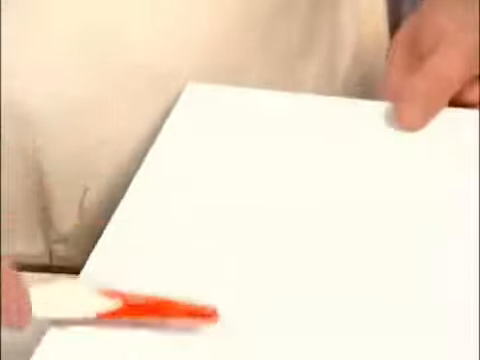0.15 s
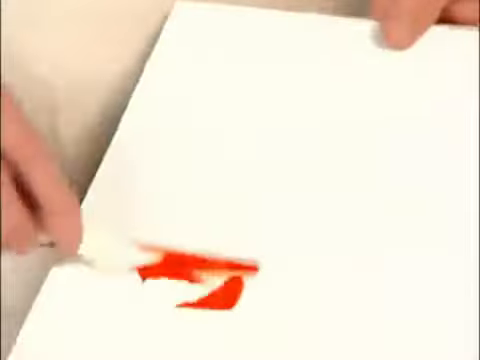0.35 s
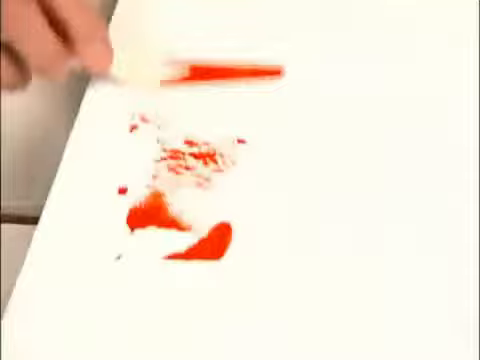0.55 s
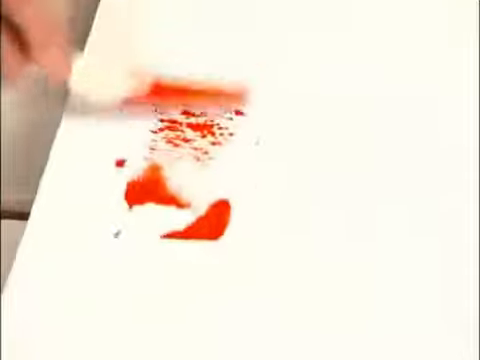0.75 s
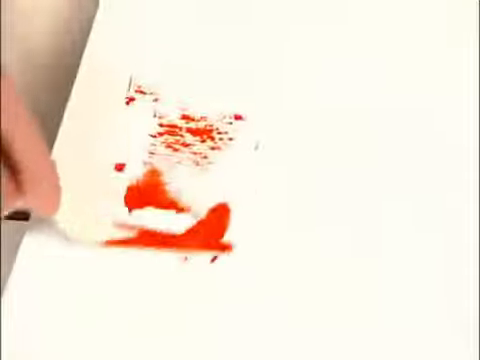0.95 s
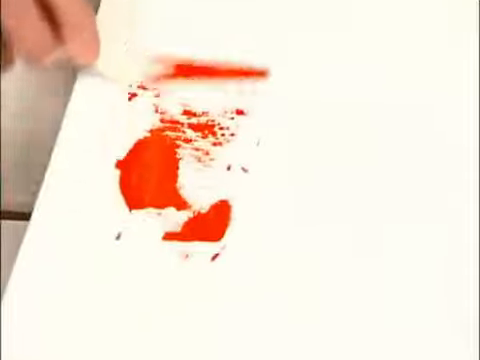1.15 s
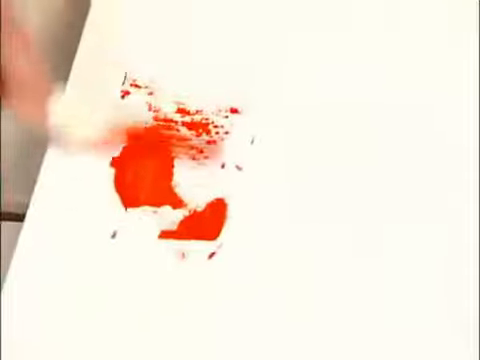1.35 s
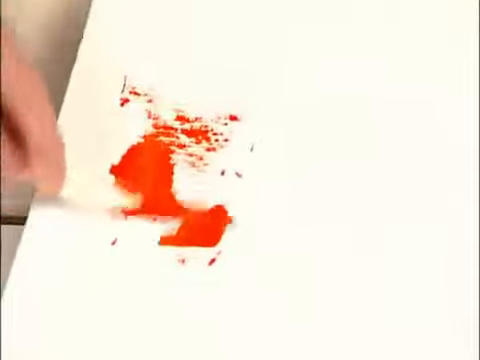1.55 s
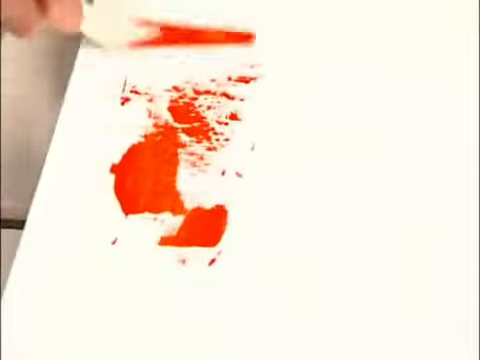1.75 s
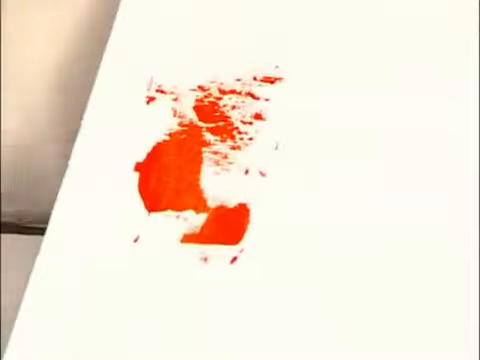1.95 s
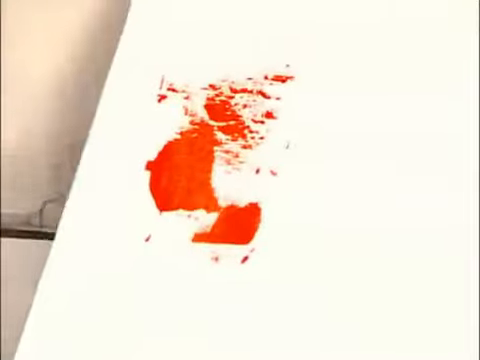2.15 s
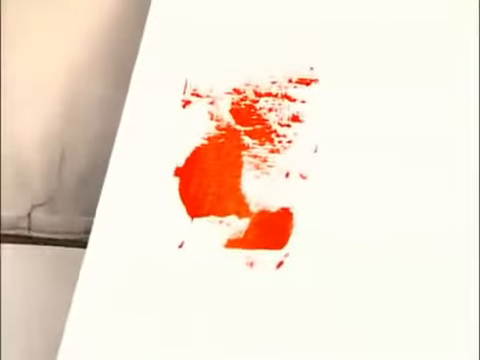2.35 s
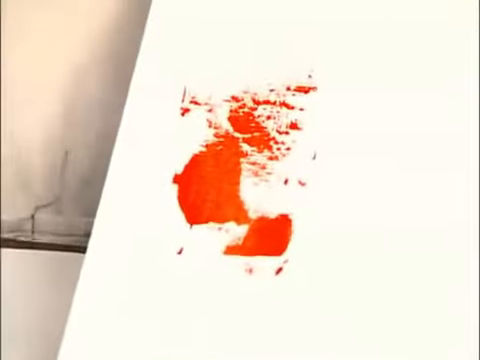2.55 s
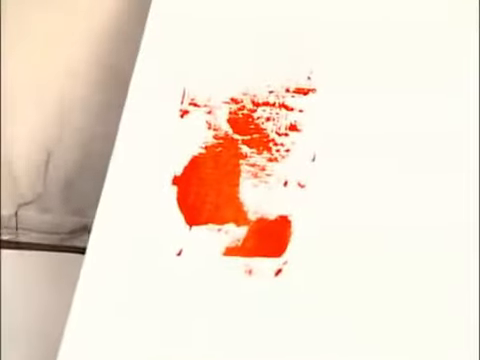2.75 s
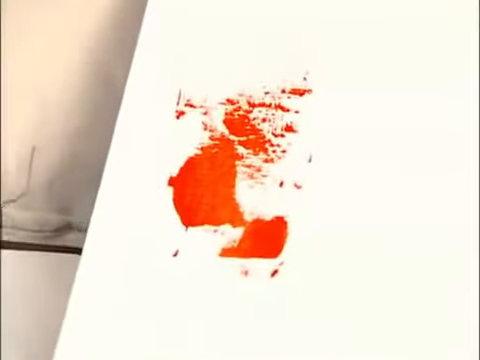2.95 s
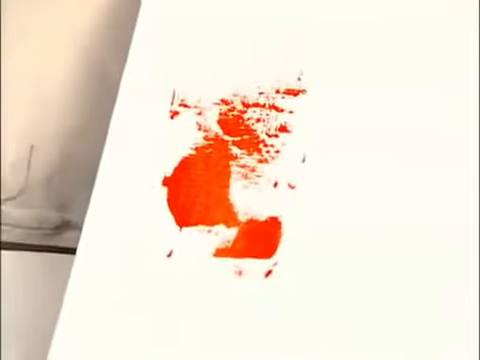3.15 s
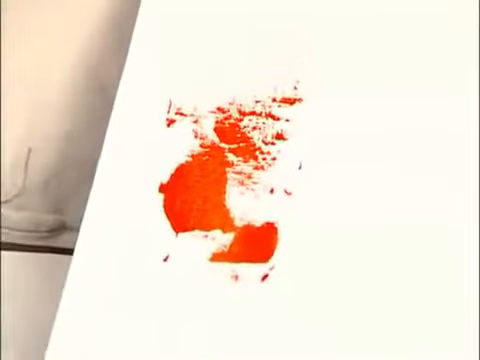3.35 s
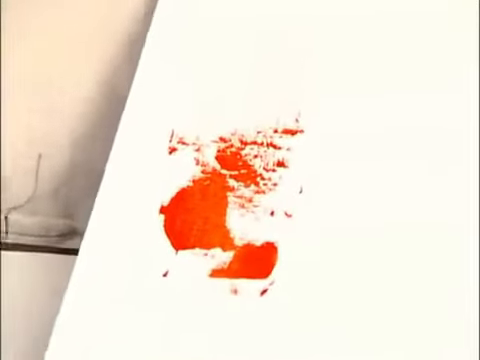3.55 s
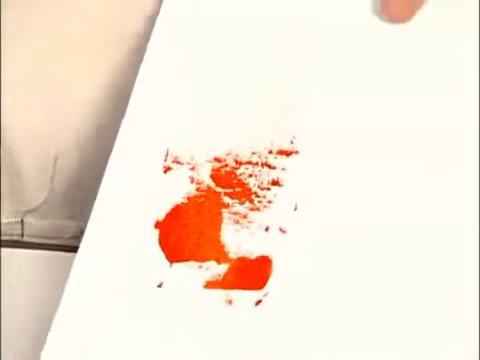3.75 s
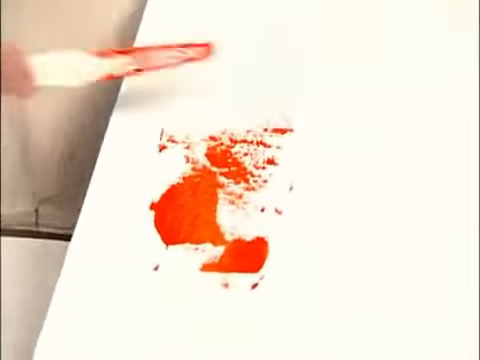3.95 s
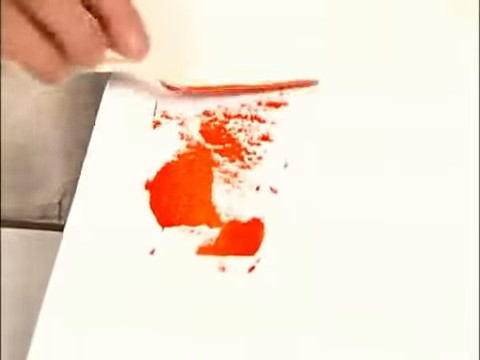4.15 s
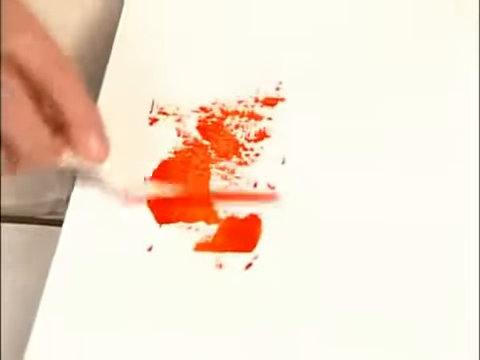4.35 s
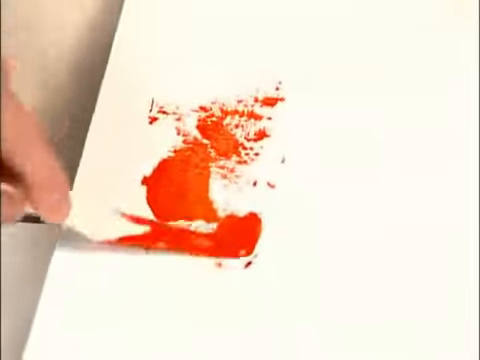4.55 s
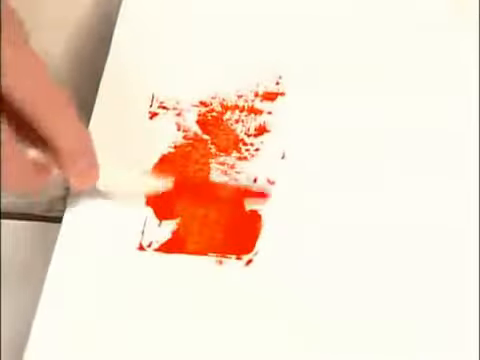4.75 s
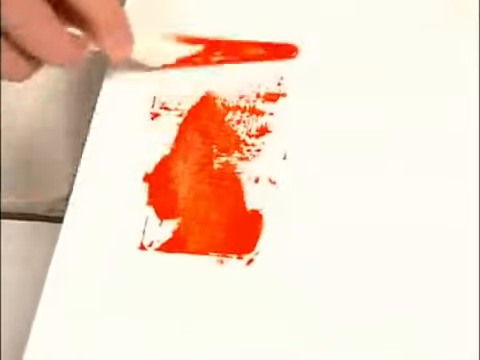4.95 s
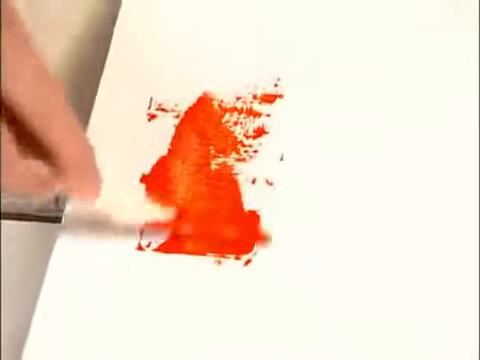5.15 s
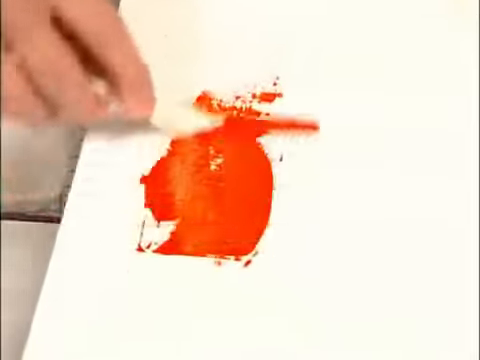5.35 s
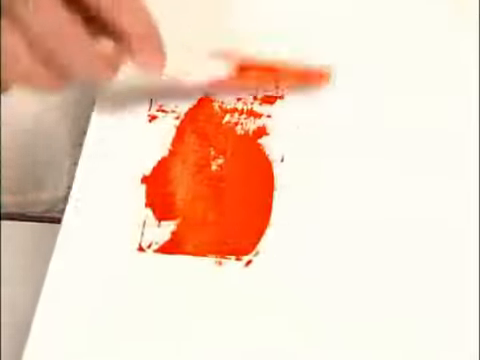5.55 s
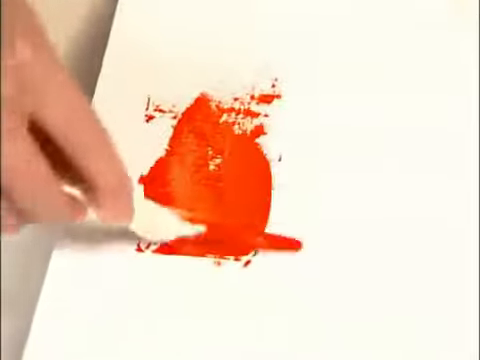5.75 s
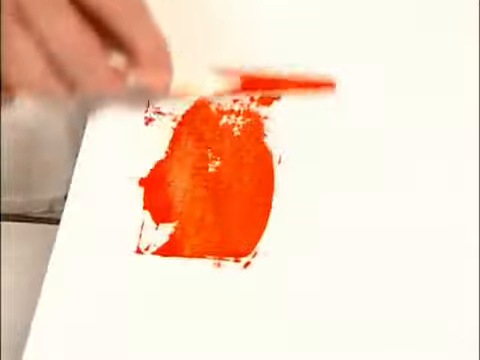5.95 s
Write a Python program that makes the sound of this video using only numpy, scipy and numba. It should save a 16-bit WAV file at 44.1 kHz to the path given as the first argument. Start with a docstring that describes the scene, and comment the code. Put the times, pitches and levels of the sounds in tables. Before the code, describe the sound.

A small, quiet indoor room with faint low air and barely audible mains hum, heard close up. From 0.45 s a paint-loaded blade scrapes a canvas board: two joined raspy strokes to about 0.8 s, ending in a dull, wet little smack. Another pair runs from 1.1 to 1.4 s, the first swelling into its lift, the second hissier, then a third pair from 1.7 to 1.95 s. Each is a dry, bright, gritty swish with a hollow board rub beneath. From 2 to 4.3 s it is nearly silent: a soft airy wipe around 2.4 s, a very faint cloth whirr, light taps, and a dull board shift near 3.6 s. Firmer strokes return at 4.35, 4.87, 5.4 and 5.93 s, spaced about half a second apart, with knocks on landing, a hard click at 4.87 s, a sharp snap near 5 s, and the last stroke swelling strongly at the end.

```python
"""Painting blade on a canvas board

A flat painting blade spreads paint over a canvas board in two runs of quick strokes, close by in a small quiet room.
Its edge sticks and slips on the weave thousands of times a second: random slips excite resonances,
so the blade rasps high up and the board answers with a hollow rub. Ticks, snags and smacks are short transients.
Between the strokes it scoops fresh paint (swelling filtered slips), a ribbed sleeve sings faintly
and the board is shifted in the hand; room air (filtered noise) and mains hum (a sine) lie underneath."""
import sys
import numpy as np
from scipy import signal
from scipy.fft import rfft, irfft, next_fast_len
from scipy.io import wavfile
from scipy.ndimage import uniform_filter1d
from numba import njit

SR = 44100
rng = np.random.default_rng(int(sys.argv[2]) if len(sys.argv) > 2 else 0)


def file_out(sig):
    """Save sig as 16-bit WAV at sys.argv[1]."""
    # one column per channel
    cols = np.atleast_2d(sig).T
    # limit, then scale
    lim = np.clip(cols, -1, 1)
    pcm = np.round(lim * 32767).astype(np.int16)
    wavfile.write(sys.argv[1], SR, pcm)


N = 268701
T = np.arange(N) / SR  # time [s]

# Sweeps of the blade; force is 0 dB in a firm stroke, and the colour depends on where and at what angle it is held:
# (start [s], swell [s], ease [s], crest force [dB], force on landing re crest [dB], force on lifting re crest [dB],
#  edge sizzle at 0 dB force [dB], blade resonance at the crest [Hz], blade's low mode re scratch [dB],
#  board at 0 dB force [dB], board resonance [Hz], upper board modes, relative [dB])
STROKES = [ (0.458, 0.12, 0.12, -2.5, -21, -27.5, -52, 5950, -8.5, -46.5, 695, -3),
           (0.666, 0.03, 0.085, -0.5, -9, -6.5, -50.5, 6660, -8, -48.5, 612, -3),
           (1.090, .160, .020, -16.5, -27, -3.5, -54, 7330, -5, -50, 620, -1),
           (1.262, 0.075, 0.043, -2, -16, -2, -42, 6950, -1, -50.5, 622, 0.5),
           (1.695, .092, 0.031, -2, -12, -11, -45.5, 6990, -7, -44, 595, -4.5),
           (1.881, 0.041, 0.01, -12, -24, -2.5, -50.5, 7030, -9, -51, 594, -9.5),
           (4.337, 0.12, 0.13, 3, -21, -18.5, -55, 5830, -6, -46.5, 719, -1.5),
           (4.863, .124, 0.13, 6, -23.5, -14.5, -50.5, 6250, -6, -47, 585, -0.5),
           (5.404, .140, 0.1, -2, -11, -9, -49.5, 6850, -9.5, -47, 576, -3.5),
           (5.933, 0.11, 0.04, 3.5, -13.5, 3, -45.5, 6790, -14.5, -46, 590, 1.5), ]
# The blade's broad scratch: (frequency [Hz], spectral level [dB])
SCRATCH_COLOUR = [(900, -25.5), (1500, -0.5), (1750, 3), (2000, -8.5), (2400, 4), (3200, 4.5), (4200, 0),
                  (5500, -3), (8000, -20), (12000, -25.5)]
# The thin edge parting wet paint: (frequency [Hz], spectral level [dB])
SIZZLE_COLOUR = [(5000, 1.5), (8000, 6), (9800, 12), (11500, 6.5), (13000, 0), (15000, -11)]
# The flat of the blade digs in and the board grunts at the pitch of that spot: (time [s], level [dB], pitch [Hz])
DIGS = [(0.488, -48.5, 760), (0.565, -46, 720), (0.800, -51, 560), (1.151, -54.5, 490), (1.403, -48, 600),
        (1.719, -41.5, 500), (1.919, -45, 610), (4.877, -45, 600), (4.965, -40, 590), (5.094, -48, 580),
        (5.439, -37, 570), (5.650, -46.5, 640), (5.975, -39, 580)]
DIG_S = 0.01  # time from the middle of a dig until its depth is 1 / e
RASP_DB, SCRATCH_DB = -38.5, -51  # levels at 0 dB force
SCRATCH_SLOPE, SIZZLE_SLOPE, BOARD_SLOPE = 0.65, 0.38, 0.35  # dB per dB of force: these grow more slowly than the rasp
BLADE_LOW_HZ = 2300  # the blade's low bending mode, on average
BLADE_RISE_OCT_PER_S = 1  # the blade's resonance climbs as it is drawn along
LIFT_DB_PER_S = 510  # fade once lifted


def strokes():
    """Stick-slip friction: the same slips ring the blade and the board, and one force drives every layer."""
    rows = np.array(STROKES)
    current = np.maximum(np.searchsorted(rows[:, 0], T) - 1, 0)
    (start, swell_s, ease_s, crest_db, land_db, lift_db,
     sizzle_db, blade_hz, low_db, board_db, board_hz, upper_db) = rows[current].T
    since_crest = T - start - swell_s
    force_db = crest_db + swell(since_crest, swell_s, ease_s, land_db, lift_db)
    touching = gate(start, swell_s + ease_s, LIFT_DB_PER_S)
    blade_hz = blade_hz * 2 ** (BLADE_RISE_OCT_PER_S * np.clip(since_crest, -swell_s, ease_s))

    slips = catches(per_s=5400, spread_db=3.0, patchy_db=1.17, patch_rate=240)
    ring = unit(blade(slips, blade_hz))
    # coarser catches scratch; the slips also bend the blade in its low mode
    coarse = catches(per_s=5400, spread_db=3.5, patchy_db=1.0, patch_rate=89)
    low_hz = BLADE_LOW_HZ * (1 + 0.026 * walk(25))
    low_mode = unit(resonate(slips, low_hz, width_hz=630))
    scratch = unit(colour(coarse, SCRATCH_COLOUR)) + undb(low_db) * low_mode
    parting = catches(per_s=2000, spread_db=3.5, patchy_db=-1.95, patch_rate=100)
    sizzle = unit(colour(parting, SIZZLE_COLOUR))
    rasp = (undb(RASP_DB + force_db) * ring
            + undb(SCRATCH_DB + SCRATCH_SLOPE * force_db) * scratch
            + undb(sizzle_db + SIZZLE_SLOPE * force_db) * sizzle)
    rasp = glance(rasp, lag_s=.00223, share=0.068)

    # the whole face of the blade also drags on the board through the paint
    drag = catches(per_s=6000, spread_db=3, patchy_db=2.0, patch_rate=45)
    digs = 0
    for time, db, hz in DIGS:
        depth = np.exp(-((T - time) / DIG_S) ** 2)
        digs = digs + undb(db) * depth
        board_hz = board_hz + (hz - board_hz) * depth ** .3  # the pitch bends over more slowly than the level
    rub = unit(board(slips + 1.18 * drag, board_hz, upper_db))
    stroke_gain = touching * undb(board_db + BOARD_SLOPE * force_db)
    return touching * rasp + np.hypot(stroke_gain, digs) * rub


SWELL_POWER = 1.5  # roundness of the crest


def swell(since_crest, rise_s, fall_s, first_db, last_db):
    """Force envelope in dB re its crest: it builds from the landing and eases towards the lift."""
    away = np.clip(np.maximum(-since_crest / rise_s, since_crest / fall_s), 0, 1)
    return np.where(since_crest < 0, first_db, last_db) * away ** SWELL_POWER


# The blade's narrow modes, which slide with its main resonance:
# (ratio to main resonance, width of each filter pass [Hz], mean level [dB])
BLADE_MODES = [(0.761, 400, -31.5), (0.958, 491, -2), (1.068, 401, 1), (1.2, 600, -5)]


def blade(push, main_hz):
    """Modal resonance: one broad mode, and narrow modes that quiver and trade strength with the contact point."""
    ring = resonate(push, main_hz, width_hz=4230)
    for ratio, width, db in BLADE_MODES:
        quiver = 1 + .02 * walk(45)
        strength = undb(db + 3.3 * walk(30))
        ring = ring + strength * resonate(push, ratio * main_hz * quiver, width)
    return ring


# The board's fixed modes: (frequency [Hz], width of each filter pass [Hz], level [dB])
BOARD_MODES = [(545, 70, -2), (750, 110, -3), (1075, 140, -6), (1220, 240, -16)]


def board(push, main_hz, upper_db):
    """Plate modes: a main mode that depends on where the board is pressed, and fixed modes around it."""
    ring = resonate(push, main_hz, width_hz=138)
    for k, (hz, width, db) in enumerate(BOARD_MODES):
        delayed = np.roll(push, 40 * k)  # each mode 40 samples later than the one before
        ring = ring + undb(db + upper_db * (k >= 2)) * resonate(delayed, hz, width)
    # below these modes the board hardly radiates: only a weak flexing of the whole panel is left
    flex = undb(-22.5) * resonate(push, 388, width_hz=460)
    radiating = signal.butter(5, 480, "high", fs=SR, output="sos")
    return signal.sosfilt(radiating, ring) + flex


def glance(x, lag_s, share):
    """Comb interference: one early reflection from a nearby surface ripples the spectrum."""
    return (x + share * np.interp(T - lag_s, T, x)) / np.hypot(1, share)


# The blade taps the board as it lands or flicks off; levels are those of the noise before the filters:
# (time [s], edge level [dB], board knock level [dB], decay T60 [s])
TICKS = [(0.431, -49.5, -27.5, 0.08), (0.465, -36.5, -52, 0.037), (0.818, -40.5, -44, 0.022),
         (1.06, -38.5, -35, 0.034), (1.409, -36, -29, 0.02), (1.622, -39, -35.5, 0.16),
         (4.31, -35, -25.5, 0.057), (4.757, -50.5, -39, 0.037), (4.798, -48.5, -37.5, 0.042),
         (4.819, -39.5, -30.5, 0.028), (4.868, -21, -23.5, 0.038), (4.888, -26.5, -47, 0.024),
         (5.354, -43, -35, 0.092), (5.408, -40, -21, 0.033), (5.645, -29.5, -24.5, 0.014),
         (5.679, -39, -51, 0.015), (5.897, -36.5, -37, 0.011), (5.935, -45, -22.5, 0.013)]
# Clicking blade: (frequency [Hz], spectral level [dB])
TICK_COLOUR = [(600, -17.5), (1200, -17.5), (1900, -8.5), (2600, -20.5), (4500, -13.5), (6200, -9),
               (8000, -10), (10000, -13.5), (15000, -35)]


def ticks():
    """Impact excitation: each touch is a short burst of slips that clicks in the blade and knocks on the board."""
    edge, knock = 0, 0
    for time, db, knock_db, t60 in TICKS:
        # the first contact is a hard tick, the rest a softer skid
        touch = burst(time, t60) + undb(4) * burst(time, t60=0.0097)
        edge = edge + undb(db) * touch
        knock = knock + undb(knock_db) * touch
    return colour(edge, TICK_COLOUR) + board(knock, main_hz=744, upper_db=-5.5)


# The edge snags on the weave and snaps free: (time [s], peak level of one full snap [dB])
SNAGS = [(0.6767, -26.5), (1.7215, -32), (1.776, -25.5), (1.916, -37.5), (4.4077, -24.5), (4.9793, -10.5),
         (4.996, -16.5), (5.1150, -26), (5.6136, -36), (5.6458, -28.5), (5.9514, -27), (5.9975, -25),
         (6.06, -32), (6.0854, -23)]


def snags():
    """Impulse response: a snag frees itself in two quick slips, the second stronger, each a sharp ringing snap."""
    slip = 1. * (T == 0)
    ring = undb(25.5) * resonate(slip, 6560, width_hz=1020)
    snap = colour(slip, TICK_COLOUR) + 1.5 * colour(slip, SIZZLE_COLOUR) + ring
    snap = snap / np.abs(snap).max()
    pair = .6 * snap + np.interp(T - .0018, T, snap, left=0)
    return sum(undb(db) * np.interp(T - time, T, pair, left=0) for time, db in SNAGS)


# The blade peels off the wet paint with a smack: (time [s], burst level before the resonance [dB], pitch [Hz])
SMACKS = [(0.841, -26, 970), (1.431, -35, 1090), (5.678, -60, 1063)]


def smacks():
    """Damped resonance: the paint film breaks with a very short, dull pop."""
    return sum(undb(db) * resonate(burst(time, t60=0.021), hz, width_hz=830) for time, db, hz in SMACKS)


# The held board flexes with a soft low bump: (time [s], level before the envelope [dB], pitch [Hz])
BUMPS = [(0.15, -53.5, 234), (0.841, -46.5, 140), (0.958, -52, 238), (1.129, -49, 272), (2.123, -52, 148),
         (2.293, -51.5, 253), (3.567, -45.5, 337), (4.343, -44, 168), (4.386, -43.5, 174)]


def bumps():
    """Damped oscillation: the board flexes as a whole, heavily damped by the hand."""
    out = 0
    for time, db, hz in BUMPS:
        age = np.maximum(T - time, 0)
        envelope = (1 - np.exp(-age / 0.0026)) * np.exp(-age / 0.0066)
        out = out + undb(db) * np.sin(2 * np.pi * hz * age) * envelope
    return out


# Soft swishes beside the canvas, from paint wiped off the palette or a moving sleeve:
# (crest time [s], rise [s], fall [s], level at the crest [dB], low scrape re wipe [dB])
WIPES = [(0.17, 0.28, .11, -74.5, -5.5), (0.42, .2, 0.16, -75, -7), (1.08, 0.27, .1, -70.5, -20),
         (2.10, 0.37, 0.2, -76, -4), (2.436, 0.1, 0.24, -53, -37), (2.69, 0.22, 0.17, -75.5, -41),
         (2.943, 0.013, 0.13, -71.5, -9), (3.068, 0.1, 0.033, -68, 5), (3.26, 0.031, 0.043, -76, -9),
         (3.438, 0.34, 0.23, -65, -30), (3.565, 0.035, 0.048, -76, 12), (4.68, 0.3, 0.44, -71.5, -19)]
# Soft wipe: (frequency [Hz], spectral level [dB])
WIPE_COLOUR = [(400, -8), (600, -3.5), (850, -14.5), (1100, -9), (2500, -7.5), (4200, -10), (5300, -5.5),
               (7000, -6.5), (10000, -13), (15000, -21)]
WIPE_DEPTH_DB = 20  # a swish gains this much over its rise and loses it over its fall


def palette():
    """Friction noise: wipes swell and fade, with a lower scrape when the blade presses through the paint."""
    slips = catches(per_s=5100, spread_db=2.0, patchy_db=0.46, patch_rate=100)
    wipe = unit(colour(slips, WIPE_COLOUR))
    scrape = unit(resonate(slips, 2710, width_hz=1860) + 1.8 * resonate(slips, 1950, width_hz=200))
    out = 0
    for crest, rise_s, fall_s, db, scrape_db in WIPES:
        away = np.maximum((crest - T) / rise_s, (T - crest) / fall_s)
        out = out + undb(db - WIPE_DEPTH_DB * away) * (wipe + undb(scrape_db) * scrape)
    return out


# a sleeve slides past in one movement of the arm, which speeds up and slows down
SLEEVE_FASTEST_S, SLEEVE_RISE_S, SLEEVE_FALL_S = 2.65, .59, .30
THREAD_HZ, SLEEVE_DB = 3020, -71  # rate at which its threads pass at full speed; level at full speed


def sleeve():
    """Periodic roughness: ribbed cloth sings as overtones of the thread rate arch up and down with the speed."""
    since = T - SLEEVE_FASTEST_S
    speed = np.maximum(1 - np.maximum(-since / SLEEVE_RISE_S, since / SLEEVE_FALL_S) ** 2, 0)
    slips = rng.standard_normal(N)
    song = sum(resonate(slips, k * THREAD_HZ * speed, width_hz=160) for k in range(2, 6))
    return undb(SLEEVE_DB) * speed ** 2 * unit(song)


# Light taps away from the canvas, while paint is picked up and the board is gripped:
# (time [s], burst level before colouring [dB])
TAPS = [(2.9006, -60.5), (2.9264, -54.5), (3.254, -51), (3.55, -56.5), (3.634, -52), (3.689, -57.5),
        (3.7344, -60), (3.7784, -54), (4.0023, -60), (4.062, -51)]


def taps():
    """Decaying noise bursts: small soft contacts with the same colour as the wipes."""
    return colour(sum(undb(db) * burst(time, t60=0.15) for time, db in TAPS), WIPE_COLOUR)


# Dull rub of the board in the hand: (frequency [Hz], spectral level [dB])
SHIFT_COLOUR = [(120, -57), (200, -15), (323, 3), (422, -5), (635, -5.5), (759, -13.5), (1060, -6.5),
                (1490, -20), (2050, -13), (2830, -31), (3760, -22), (4250, -35), (5300, -27), (7120, -29),
                (14000, -60)]
SHIFT_START_S, SHIFT_HOLD_S, SHIFT_DB, SHIFT_FADE_DB_PER_S = 3.55, 0.25, -61.5, 139


def shift():
    """Sliding friction: the board slides a little in the hand with a dull, soft rub."""
    slips = catches(per_s=7000, spread_db=1.0, patchy_db=3.0, patch_rate=70)
    rub = undb(SHIFT_DB) * unit(colour(slips, SHIFT_COLOUR))
    return gate(SHIFT_START_S, SHIFT_HOLD_S, SHIFT_FADE_DB_PER_S) * rub


# Room air: (frequency [Hz], spectral level [dB])
AIR_COLOUR = [(18, -26.5), (30, -11), (129, -9.5), (171, -15.5), (234, -12.5), (612, -19.5), (859, -27),
              (1370, -27), (1870, -30), (3680, -37), (4420, -36), (15000, -46)]
AIR_DB, HUM_HZ, HUM_DB = -70, 120, -74.5  # mean levels


def background():
    """Stationary noise and a pure tone: room air that stirs a little, and a slightly wavering mains hum."""
    stir = undb(.8 * walk(5))
    air = unit(colour(rng.standard_normal(N), AIR_COLOUR)) * undb(AIR_DB) * stir
    hum = np.sqrt(2) * np.sin(2 * np.pi * HUM_HZ * T) * undb(HUM_DB + 0.78 * walk(9.9))
    return air + hum


def room(x, t60, wet_db):
    """Reverberation: an exponentially decaying tail from the nearby walls, duller than the direct sound."""
    age = T[:SR // 2]
    tail = rng.standard_normal(len(age)) * np.exp(-np.log(1000) * age / t60) * (age > .004)
    wet = signal.fftconvolve(x, tail / np.linalg.norm(tail))[:N]
    return x + undb(wet_db) * colour(wet, [(100, 8), (700, 8.0), (4000, -0.5), (14000, -9.0)])


def catches(per_s, spread_db, patchy_db, patch_rate):
    """Random impulse train: tiny slips, a few much stronger than the rest, bunched into patches."""
    size = undb(spread_db * np.minimum(rng.exponential(size=N), 4.5))
    slips = (rng.random(N) < per_s / SR) * size * rng.choice([-1, 1], N)
    return unit(slips * undb(patchy_db * walk(patch_rate)))


def burst(s, t60):
    """Exponential decay: a flurry of slips that starts at s and dies away."""
    age = np.maximum(T - s, 0)
    decay = np.exp(-np.log(1000) * np.minimum(age / max(t60, .001), 4))
    return (T >= s) * rng.standard_normal(N) * decay


LANDING_S = .005  # time to touch down


def gate(start_s, hold_s, fade_db_per_s):
    """Contact envelope: it begins quickly, holds, then dies away at a steady rate in dB."""
    age = T - start_s
    on = (age >= 0) * undb(-fade_db_per_s * np.maximum(age - hold_s, 0))
    ramp = int(LANDING_S * SR) + 1
    return uniform_filter1d(on, ramp, origin=(ramp - 1) // 2)


def walk(rate):
    """Slow random modulation: levels held 1 / rate s and smoothed; rms 1."""
    hold = max(int(SR / rate), 1)
    return unit(uniform_filter1d(np.repeat(rng.standard_normal(N // hold + 1), hold), hold)[:N])


def resonate(x, hz, width_hz):
    """Cascaded resonance: the band-pass applied twice for steep skirts."""
    centre = np.clip(hz * np.ones(N), 20, SR * .44)
    once = svf(x + 1e-18, centre, float(width_hz))
    return svf(once, centre, float(width_hz))


@njit
def svf(x, hz, width):
    """State-variable band-pass: two integrators in a loop, whose centre may move every sample."""
    y, band, low = np.empty(len(x)), 0., 0.
    for i in range(len(x)):
        g, k = np.tan(np.pi * hz[i] / SR), width / hz[i]
        v = (band + g * (x[i] - low)) / (1 + g * (g + k))
        band, low, y[i] = 2 * v - band, low + 2 * g * v, k * v
    return y


def colour(x, points):
    """Minimum-phase filter, by folding the cepstrum, through (frequency [Hz], level [dB]) points."""
    hz, db = np.transpose(points)
    size = next_fast_len(N + 8192, real=True) * 2
    f = np.maximum(np.arange(size // 2 + 1) * SR / size, 1)
    low_cut_db = 20 * np.log10(np.minimum(f / hz[0], 1) ** 2)  # 12 dB per octave below the first point
    shape = np.interp(np.log(f), np.log(hz), db) + low_cut_db
    cepstrum = irfft(np.log(undb(shape) + 1e-5))
    cepstrum[1:size // 2] *= 2
    cepstrum[size // 2 + 1:] = 0
    return irfft(rfft(x, size) * np.exp(rfft(cepstrum)))[:N]


def undb(db):
    """Decibel law: level to amplitude gain."""
    return 10 ** (np.asarray(db) / 20)


def unit(x):
    """Normalisation to rms 1."""
    return x / np.sqrt(np.mean(x ** 2))


def scene():
    """Superposition: canvas work is close and dry; handling is further off and carries more room."""
    near = strokes() + ticks() + snags() + smacks() + bumps()
    far = palette() + sleeve() + taps() + shift()
    near = room(near, t60=0.31, wet_db=-20.5)
    far = room(far, t60=0.051, wet_db=-14.5)
    return (near + far + background())[None]


TOP_HZ = 15200


def record(dry):
    """Band limiting: a steep elliptic low-pass cuts the top."""
    return signal.sosfilt(signal.ellip(10, .2, 70, TOP_HZ, fs=SR, output="sos"), dry)


dry = scene()
out = record(dry)
file_out(out)
```